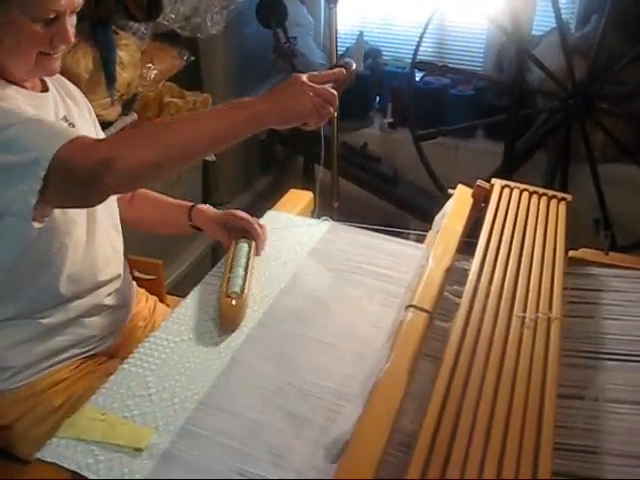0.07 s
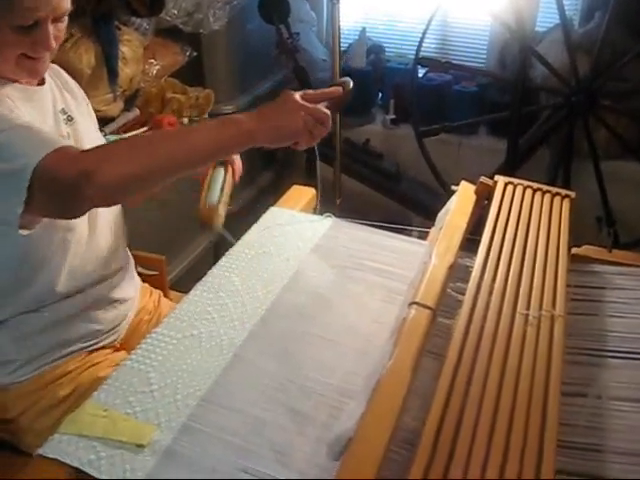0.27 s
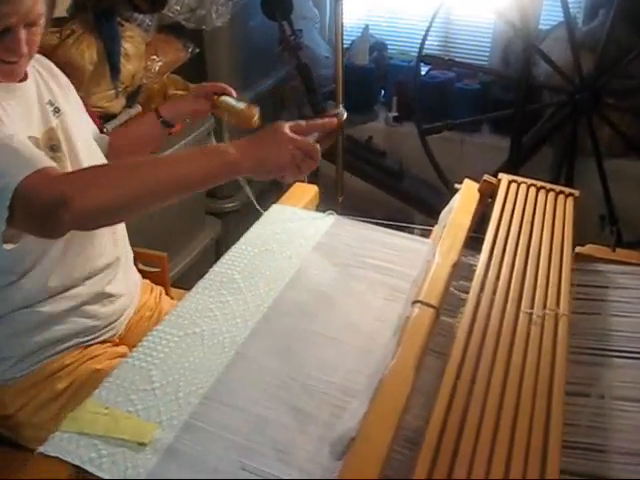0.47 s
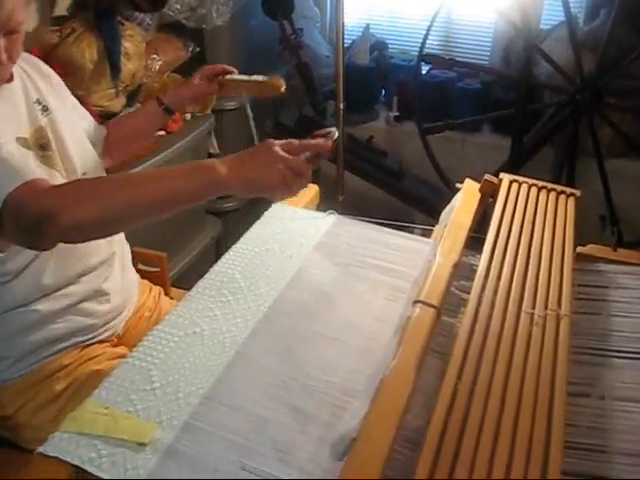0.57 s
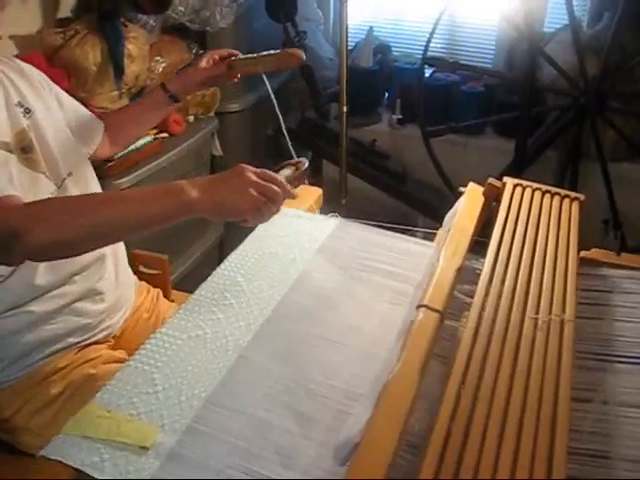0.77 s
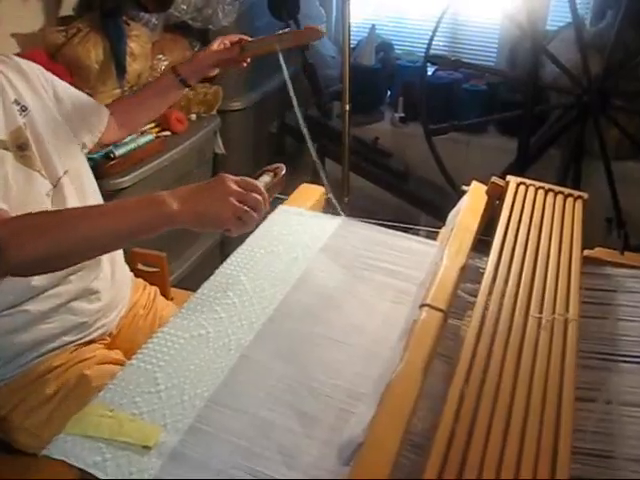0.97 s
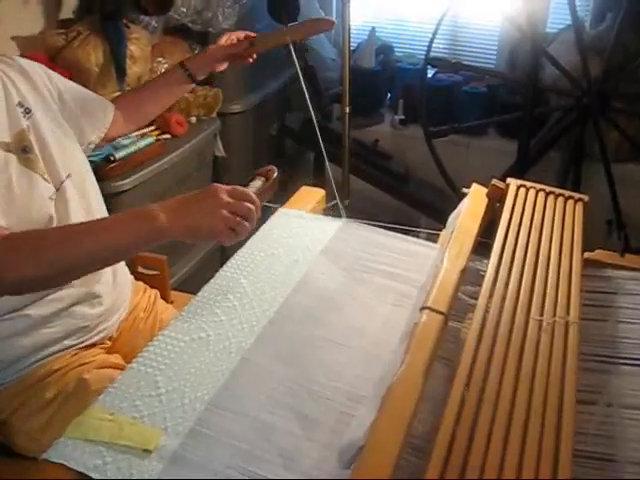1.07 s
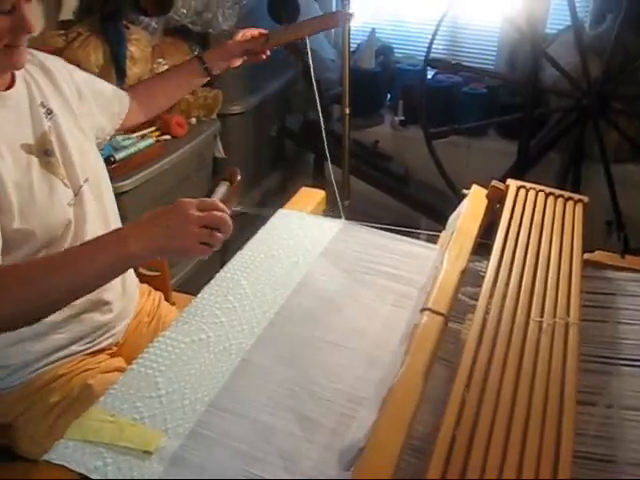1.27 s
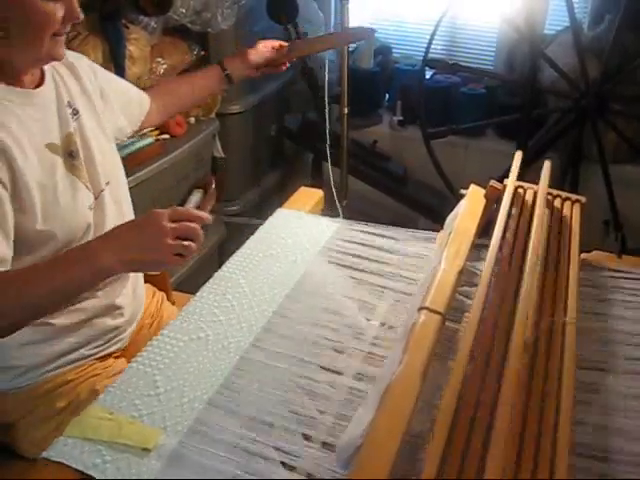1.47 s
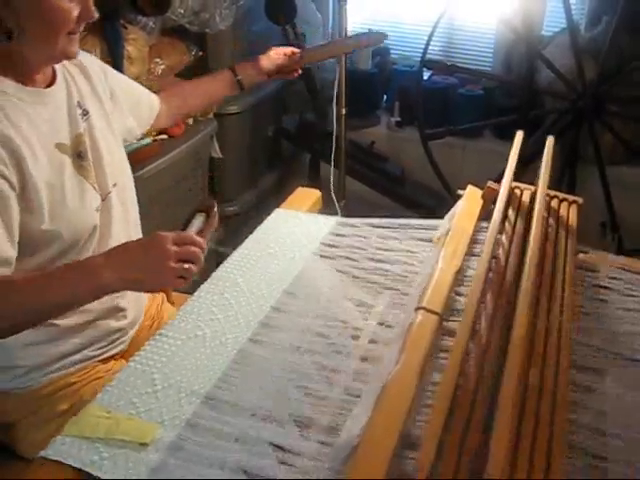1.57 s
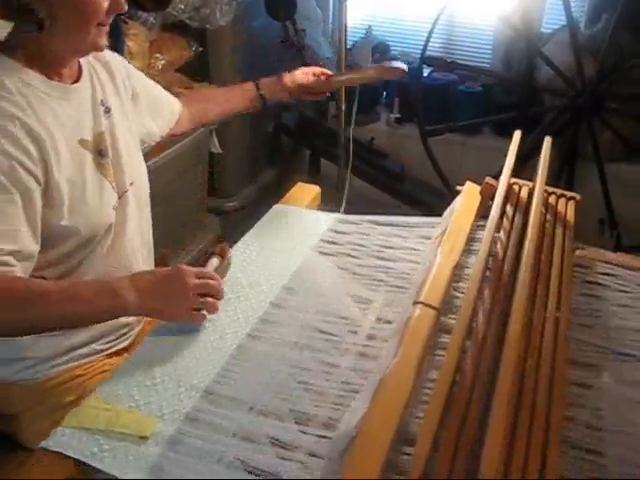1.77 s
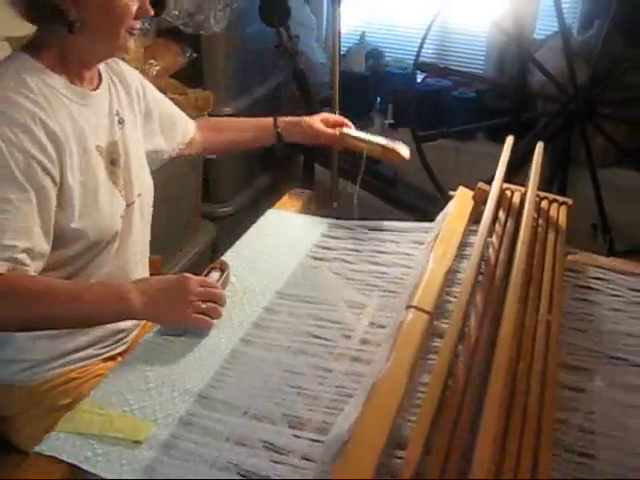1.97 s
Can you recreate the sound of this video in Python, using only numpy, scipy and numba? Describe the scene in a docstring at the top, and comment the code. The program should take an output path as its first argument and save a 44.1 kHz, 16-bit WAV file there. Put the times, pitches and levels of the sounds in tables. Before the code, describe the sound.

A wooden loom clatters in a small room. Shuttles knock and skitter over threads, then a treadle creaks, metal heddles rustle and squeak, and the frames clack sharply. A small microphone adds slight grit over a faint hum.

```python
"""A small room with a mains hum, where a wooden jack loom is at work. Shuttles knock and skitter through
the warp, each impact exciting the modes of the wood. Then a creaking treadle lifts the harnesses: joints
squeak by stick-slip friction, metal heddles rustle and ring, and the frames clack home.
A small camera picks it up; its gain control ducks the loud parts and its coarse sampling adds grit."""
import sys
import numpy as np
from scipy import signal
from scipy.fft import rfft, irfft, next_fast_len
from scipy.io import wavfile
from scipy.ndimage import uniform_filter1d
from numba import njit

SR = 44100
rng = np.random.default_rng(int(sys.argv[2]) if len(sys.argv) > 2 else 0)


def master_out(mix):
    """Clip the mix to full scale and print it as 16-bit PCM to the path in sys.argv[1]."""
    frames = np.transpose(np.atleast_2d(mix))
    ceiling = np.clip(frames, -1, 1)
    pcm = np.round(ceiling * 32767).astype(np.int16)
    wavfile.write(sys.argv[1], SR, pcm)


N = 89302


def undb(db):
    """Amplitude ratio of a level in decibels."""
    return 10 ** (np.asarray(db) / 20)


def unit(x):
    """Normalisation to rms 1."""
    return x / np.sqrt(np.mean(x ** 2))


def fade(t, t60):
    """Exponential damping: 60 dB in t60 seconds."""
    return undb(-60 * t / t60)


def curve(rows):
    """Amplitude envelope through (s, dB) rows, silent outside them."""
    return undb(np.interp(np.arange(N) / SR, *np.array(rows).T, left=-120, right=-120))


def colour(x, points):
    """Minimum-phase filter through (Hz, dB) points, with unit power gain and a cutoff at 6.5 kHz."""
    n = next_fast_len(len(x) // 2 + 2048) * 2
    freqs = np.arange(n // 2 + 1) * SR / n + 1
    hz, db = np.array(points).T
    gain = undb(np.interp(np.log(freqs), np.log(hz), db))
    gain = unit(gain / (1 + (freqs / 6500) ** 16))
    cepstrum = irfft(np.log(gain))
    cepstrum[1:n // 2] *= 2  # folding makes the filter causal
    cepstrum[n // 2 + 1:] = 0
    return irfft(rfft(x, n) * np.exp(rfft(cepstrum)))[:len(x)]


def convolve(x, response):
    """Linear response: convolution with an impulse response scaled to unit energy."""
    return signal.fftconvolve(x, response / np.sqrt(np.sum(response ** 2)))[:N]


def ring(x, modes):
    """Forced vibration of damped modes; each mode's level sets its share of the power."""
    t = np.arange(SR // 2) / SR
    response = sum(undb(db) / np.sqrt(t60) * fade(t, t60) * np.sin(2 * np.pi * hz * t)
                   for hz, db, t60 in modes)
    return convolve(x, response)


def ticks(per_s, spread_db=0):
    """Shot noise: a Poisson train of tiny contacts, rms 1."""
    impulses = (rng.random(N) < per_s / SR) * np.sign(rng.standard_normal(N))
    return unit(impulses * undb(spread_db * rng.standard_normal(N)))


def octaves(hz):
    """Interval above 1200 Hz in octaves; pitches under 400 Hz count as 400."""
    return np.log2(max(hz, 400) / 1200)


def blows(rows, modes, spectrum, crack_db, ring_db, t60):
    """Impact excitation: a noisy crack, a note from the struck spot, a snap and freely ringing modes."""
    chatter_s, snap_db, snap_t60_s = .005, -17, .0045
    out, t = np.zeros(N + SR), np.arange(SR // 3) / SR
    for start, db, length, spot_hz, spot_db in rows:
        tilt = 2.5 * octaves(spot_hz)  # dB per octave: higher-pitched spots are harder and brighter
        decay = fade(t, t60 * length)
        contact = np.minimum(decay / fade(chatter_s, t60), 1)  # level while the parts chatter
        tilted = [(hz, level + tilt * octaves(hz)) for hz, level in spectrum]
        blow = undb(crack_db) * colour(rng.standard_normal(len(t)) * contact, tilted)
        blow += undb(crack_db + spot_db) * decay * np.sin(2 * np.pi * spot_hz * t)
        blow += undb(snap_db + tilt) * fade(t, snap_t60_s) * rng.standard_normal(len(t))
        for hz, mode_db, mode_t60 in modes:
            detune, side = rng.standard_normal(2)
            gain = np.sign(side) * undb(ring_db + mode_db + tilt * octaves(hz))
            blow += gain * fade(t, mode_t60 * length) * np.sin(2 * np.pi * hz * (1 + .004 * detune) * t)
        i = int(start * SR)
        out[i:i + len(t)] += undb(db) * blow
    return out[:N]


def hum_and_air():
    """Steady background: a pure mains tone, which sinks late on, over the broadband rush of room air."""
    # Each row: time in seconds, relative level in dB.
    hum_level = [(0, 0.5), (1.39, 0.5), (1.5, -7.5), (2.03, -5)]
    # Each row: frequency in Hz, relative level in dB.
    air_spectrum = [(25, -25), (60, -12.5), (150, -13), (260, -3), (380, -3.5), (480, -10), (1200, -20),
                    (5400, -27.5)]
    hum_hz, hum_db, air_db = 120.4, -46, -41
    tone = np.sqrt(2) * np.sin(2 * np.pi * (hum_hz * np.arange(N) / SR + rng.random()))
    air = unit(colour(rng.standard_normal(N), air_spectrum))
    return undb(hum_db) * curve(hum_level) * tone + undb(air_db) * air


def shuttles():
    """Modal resonance: wooden shuttles ring when knocked and rumble hollowly over the threads."""
    # Each row: start in seconds, level in dB, ring length factor, spot pitch in Hz, spot level in dB.
    impacts = [(.2175, -15.5, 1.1, 1980, -2), (.2355, -15.5, 0.76, 837, 10.5), (.2445, -15, 1.13, 736, 4),
               (.280, -6.5, 0.27, 3570, 1), (.288, -15, 0.76, 1658, 9.5), (.389, -9, 0.85, 1457, 3),
               (.7095, -1.5, 1.03, 1426, 2.5), (.749, -16.5, 0.98, 930, 5), (.7815, -17.5, 1.7, 1465, 3),
               (.797, -18.5, 1.7, 1850, -5), (.814, -22, 0.64, 1270, 0), (.8365, -12.5, 0.73, 1357, 0),
               (.858, -14.5, 2.14, 1420, -0.5), (.903, -19.5, 0.36, 1430, 10), (.909, -12.5, 0.71, 911, 3),
               (.942, -22, 0.78, 1396, 9), (.9792, -6.5, 0.8, 3970, -4), (1.002, -14, 1.13, 938, 6.5),
               (1.028, -13, 0.74, 3480, 5), (1.034, -6, 0.71, 1440, 2.5), (1.039, -16.5, 1.7, 403, 6)]
    # Each row: frequency in Hz, relative level in dB, 60 dB decay time in seconds.
    wood_modes = [(382.3, 1, 0.19), (566.3, -5, 0.18), (774, 4, 0.035), (886, -3.5, 0.086),
                  (1104, -4, 0.13), (1653, -12, 0.15)]
    # Each row: frequency in Hz, relative level in dB.
    crack_spectrum = [(100, -31), (300, -2.5), (700, -2.5), (1500, -1), (3300, -9), (5500, -16)]
    # The run over the warp. Each row: time in seconds, drive level in dB.
    glide_level = [(.76, -47), (.87, -39), (.99, -44), (1.065, -37)]
    knocks = blows(impacts, wood_modes, crack_spectrum, crack_db=-18, ring_db=-24, t60=.066)
    threads = ticks(per_s=900, spread_db=3) * curve(glide_level)
    return knocks + ring(threads, wood_modes)


def squeaks():
    """Stick-slip oscillation: rubbing joints and rising frames give brief wavering tones."""
    # Each row: peak time in seconds, length in seconds, pitch in Hz, level in dB.
    rubs = [(.302, 0.0024, 1500, -27), (0.325, 0.002, 2006, -27), (1.321, 0.006, 1610, -26.5),
            (1.437, .02, 2070, -21.5), (1.477, 0.034, 2137, -24), (1.521, 0.01, 2100, -28.5),
            (1.578, 0.021, 1190, -37), (1.586, 0.011, 4150, -37), (1.613, 0.0061, 2600, -24)]
    t, out = np.arange(N) / SR, 0
    for peak, length, hz, db in rubs:
        waver = .007 * unit(uniform_filter1d(rng.standard_normal(N), size=90))
        envelope = undb(db) * np.exp(-2 * ((t - peak) / length) ** 2)
        out = out + envelope * np.sin(2 * np.pi * np.cumsum(hz * (1 + waver)) / SR)
    return out


def treadle_creak():
    """Stick-slip friction: the loaded treadle joint gives way in short, rough jerks."""
    # Each row: start in seconds, level in dB.
    slips = [(1.26, -34), (1.275, -34.5), (1.292, -33.5)]
    # Each row: frequency in Hz, relative level in dB.
    joint_spectrum = [(600, -15.5), (2500, 0), (3000, -11), (5500, -21)]
    t, decay_s = np.arange(N) / SR, .013
    jerks = sum(undb(db) * (t > start) * np.exp(-abs(t - start) / decay_s) for start, db in slips)
    return colour(rng.standard_normal(N) * jerks, joint_spectrum)


def heddles():
    """Sliding friction: metal heddles scrape along their bars, and dense contacts excite their modes."""
    # Each row of both envelopes: time in seconds, drive level in dB.
    slide_level = [(1.34, -44.5), (1.38, -24), (1.419, -24), (1.468, -22), (1.492, -28.5), (1.555, -41.5),
                   (1.59, -39), (1.685, -35), (1.706, -25), (1.722, -32), (1.745, -23.5), (1.785, -34.5),
                   (1.803, -30.5), (1.84, -45), (1.88, -47), (1.90, -41.5), (1.97, -54)]
    jingle_level = [(1.325, -38), (1.415, -27), (1.428, -15.5), (1.472, -29), (1.54, -46)]
    # Each row: frequency in Hz, relative level in dB.
    rustle_spectrum = [(400, -21), (850, 0.5), (1300, -9.5), (2100, -1), (2800, -6.5), (3600, -4),
                       (5500, -4.5)]
    # Each row: frequency in Hz, relative level in dB, 60 dB decay time in seconds.
    metal_modes = [(790, -8, .07), (882, -1, .12), (998, -2, .1), (1578, -7, .18), (1975, 2, .17),
                   (2170, -1, .06), (3657, -9, .16), (4575, -7, .18)]
    rustle = colour(ticks(per_s=2500) * curve(slide_level), rustle_spectrum)
    jingle = ring(ticks(per_s=2500) * curve(jingle_level), metal_modes)
    return rustle + undb(-7.5) * jingle


def frame_clacks():
    """Free vibration after impact: the treadle and harness frames strike and ring."""
    # Each row: start in seconds, level in dB, ring length factor, spot pitch in Hz, spot level in dB.
    impacts = [(1.3175, -16, 2, 860, 9), (1.424, -15, 3.7, 930, -3), (1.6473, -1.5, 0.93, 2600, 0.5),
               (1.657, -2.5, 0.95, 1270, -8.5), (1.671, -6, 0.76, 790, 0), (1.7455, -1.5, 0.85, 2570, -8),
               (1.762, -9, 1.16, 1370, 0.5), (1.893, -22.5, 2.8, 2130, 5)]
    # Each row: frequency in Hz, relative level in dB, 60 dB decay time in seconds.
    frame_modes = [(165.4, -12, 0.26), (286, -4.5, 0.19), (490, -4, 0.16), (1690, -5, 0.049),
                   (2530, -9, 0.13)]
    # Each row: frequency in Hz, relative level in dB.
    crack_spectrum = [(80, -41), (250, -3), (700, 4), (1300, 3), (4300, -6.5), (5500, -16)]
    return blows(impacts, frame_modes, crack_spectrum, crack_db=-16, ring_db=-24, t60=.058)


def room(x):
    """Reverberation: the diffuse reflections of a cluttered room follow the direct sound and die fast."""
    reverb_db, t60_s, gap_s = -10.5, .12, .0044
    t = np.arange(SR // 2) / SR
    reflections = rng.standard_normal(len(t)) * fade(t, t60_s) * (t > gap_s)
    return x + undb(reverb_db) * convolve(x, reflections)


@njit
def follow(x, attack_s, release_s):
    """Envelope detection: rectification, then smoothing with separate rise and fall times."""
    attack, release = 1 / (attack_s * SR), 1 / (release_s * SR)
    out, level = np.empty(len(x)), 0.
    for i in range(len(x)):
        level += (abs(x[i]) - level) * (attack if abs(x[i]) > level else release)
        out[i] = level
    return out


def scene():
    """Superposition of the reverberant loom and the background, in mono."""
    loom = shuttles() + heddles() + frame_clacks() + treadle_creak() + squeaks()
    return (room(loom) + hum_and_air())[None]


def record(dry):
    """Compression and saturation tame the peaks; sample-and-hold mirrors the spectrum into the treble."""
    threshold_db, ratio, ceiling = -19.5, 7.3, .42
    hold_samples, top_hz = 4, 15900
    level = follow(dry[0], attack_s=.015, release_s=.38)
    ducked = dry[0] * np.maximum(level / undb(threshold_db), 1) ** (1 / ratio - 1)
    anti_alias = signal.butter(8, SR / hold_samples / 2, fs=SR, output="sos")
    coarse = signal.sosfilt(anti_alias, ducked)[::hold_samples]
    held = np.repeat(ceiling * np.tanh(coarse / ceiling), hold_samples)[:N]
    treble_limit = signal.ellip(10, .2, 70, top_hz, fs=SR, output="sos")
    return signal.sosfilt(treble_limit, held)[None]


dry = scene()
out = record(dry)
master_out(out)
```